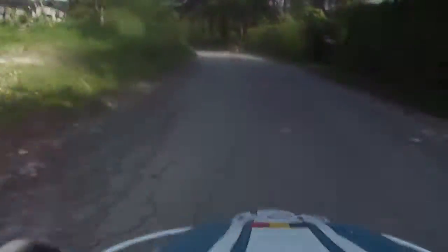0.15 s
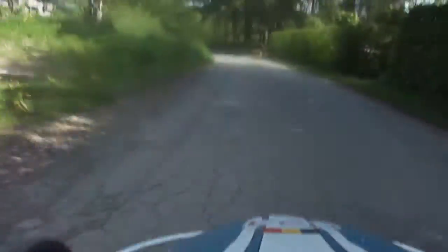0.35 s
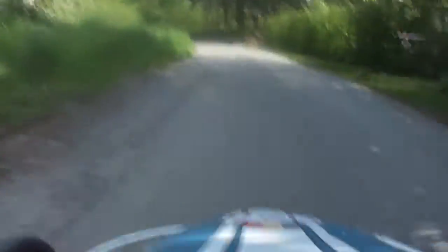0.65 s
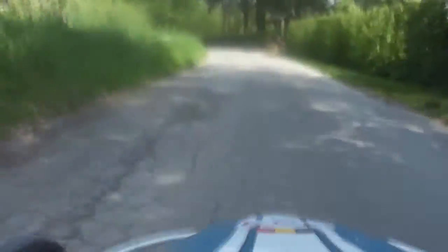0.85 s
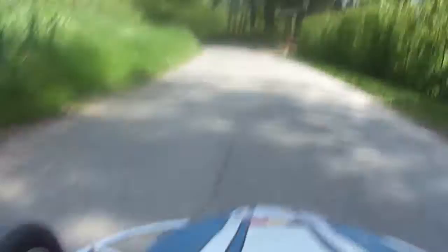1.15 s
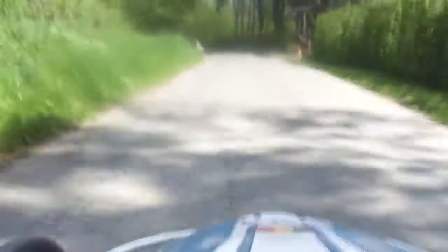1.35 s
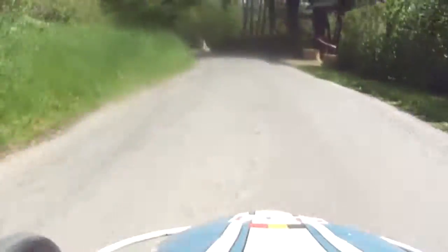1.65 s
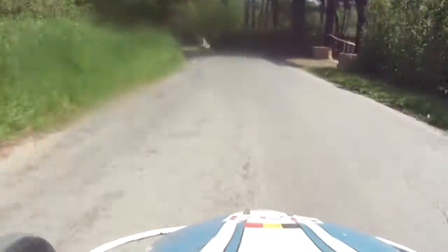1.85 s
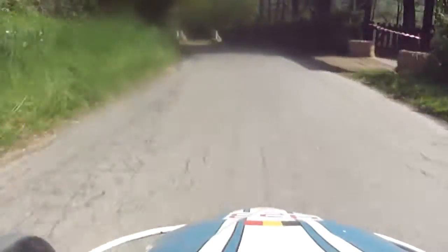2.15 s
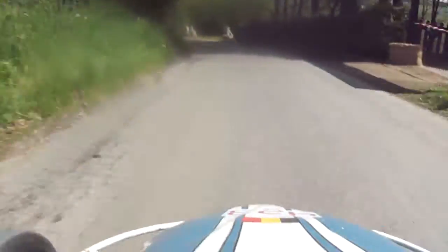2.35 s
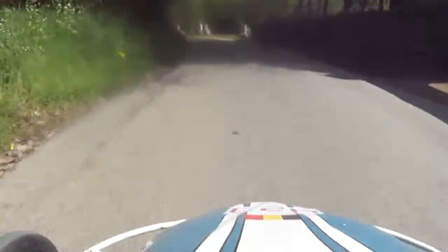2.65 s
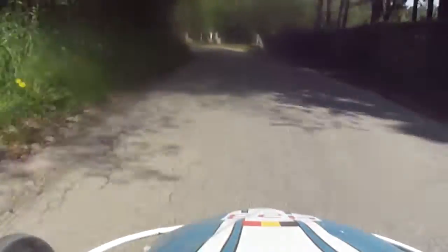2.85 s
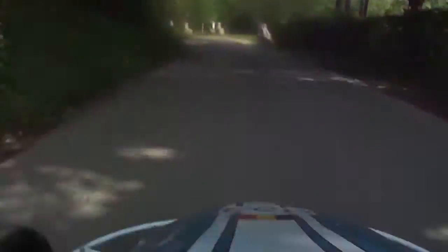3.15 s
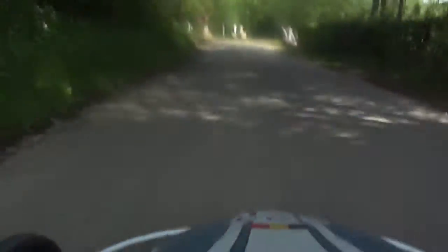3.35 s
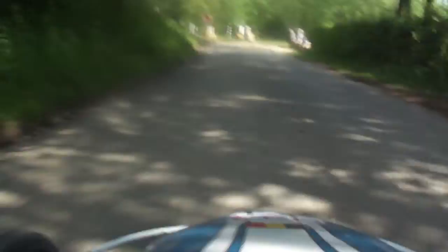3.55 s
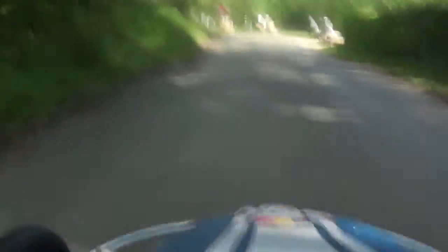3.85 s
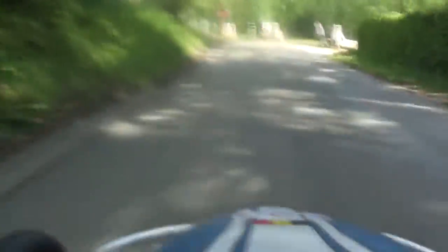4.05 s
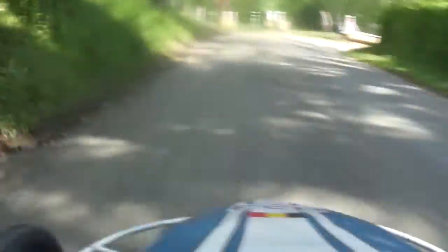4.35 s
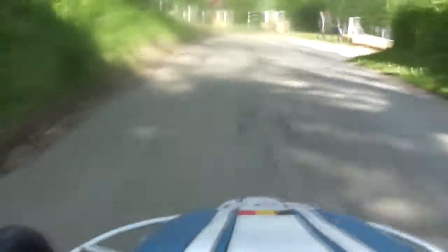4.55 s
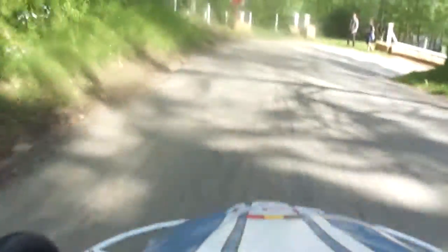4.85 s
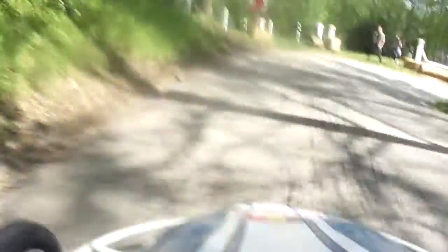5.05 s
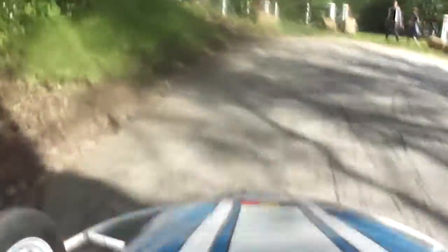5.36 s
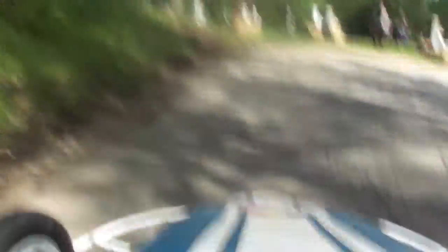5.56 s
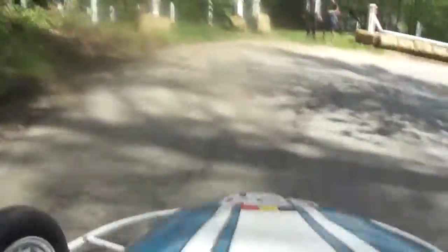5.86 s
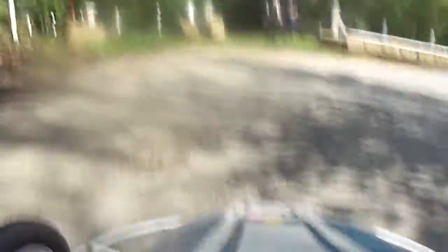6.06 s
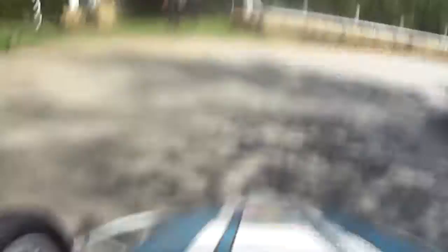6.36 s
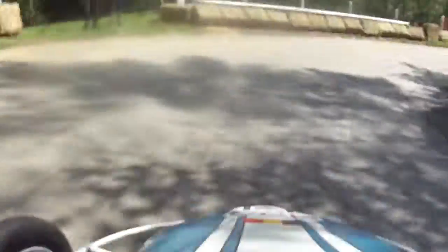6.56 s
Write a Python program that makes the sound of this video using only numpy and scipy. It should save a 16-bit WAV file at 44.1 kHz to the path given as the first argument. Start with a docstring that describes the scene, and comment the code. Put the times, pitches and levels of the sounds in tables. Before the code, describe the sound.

Fast cart rolling downhill: roaring wind buffets and gritty tyre hiss, then slowing, dry tyre judder, a sharp wheel knock and busy clattering.

```python
"""Unpowered cart on a rough bend

Eddies beat on a microphone at the nose of a fast cart and ease as it slows for a bend: noise pulses,
with single pressure swings for buffets and dull shell knocks. Tyre hiss and chassis rumble are shaped
noise; jolts swell them and the wind. Fittings rattle (noise bursts into damped modes), grit ticks. Before
and in the bend the brake rubs and a tyre judders (noise in slips); a wheel strikes one hard edge."""
import sys
import numpy as np
from scipy import signal
from scipy.fft import rfft, irfft, next_fast_len
from scipy.io import wavfile
from scipy.ndimage import uniform_filter1d

SR = 44100
rng = np.random.default_rng(int(sys.argv[2]) if len(sys.argv) > 2 else 0)


def wav_out(sig):
    """Save sig, one row per channel (or a flat mono array), as 16-bit PCM at SR to the path in sys.argv[1]."""
    wavfile.write(sys.argv[1], SR, np.round(np.clip(np.atleast_2d(sig).T, -1, 1) * 32767).astype(np.int16))


N = 295029
TIME = np.arange(N) / SR


def undb(db):
    """Decibels to gain."""
    return 10 ** (np.asarray(db) / 20)


def curves(table):
    """Columns of a table after the first, interpolated to one value per sample."""
    s, *columns = np.transpose(table)
    return [np.interp(TIME, s, c) for c in columns]


def unit(x, lo_hz, hi_hz):
    """Scale a sound so that the given band has rms 1."""
    sos = signal.butter(4, [lo_hz, hi_hz], "band", fs=SR, output="sos")
    return x / np.std(signal.sosfilt(sos, x))


def colour(x, points, size=4096):
    """Causal filter through (f/Hz, level/dB) points, built from the cepstrum of the log gain."""
    hz, db = np.transpose(points)
    bins_hz = np.maximum(np.arange(size // 2 + 1) * SR / size, 1)
    gain = undb(np.interp(np.log(bins_hz), np.log(hz), db))
    cepstrum = irfft(np.log(gain))
    # fold to minimum phase
    cepstrum[1:size // 2] *= 2
    cepstrum[size // 2 + 1:] = 0
    impulse_response = irfft(np.exp(rfft(cepstrum)))
    return signal.fftconvolve(x, impulse_response)[:N]


def around(x, hz):
    """Keep a broad band about the given frequency."""
    return signal.sosfilt(signal.butter(1, [hz / 2, hz * 2], "band", fs=SR, output="sos"), x)


def octaves(x, count=10):
    """Overlapping octave bands (centre Hz, sound) that add up to the sound again."""
    size = next_fast_len(N)
    centres_hz = SR / 2 ** np.arange(count, 0, -1)
    spectrum = rfft(x, size)
    bins_hz = np.maximum(np.arange(size // 2 + 1) * SR / size, 1)
    for hz, share in zip(centres_hz, np.eye(count)):
        weight = np.interp(np.log(bins_hz), np.log(centres_hz), share)
        yield hz, irfft(spectrum * weight, size)[:N]


def walk(rate):
    """A quick random flicker with spread 1, about `rate` turns a second and no slow drift."""
    y = np.interp(TIME * rate, np.arange(N), rng.standard_normal(N))
    y = y - uniform_filter1d(y, size=SR // 16)
    return y / y.std()


def impacts(rate, spread_db):
    """Randomly timed impulses of uneven size and sign, rms 1."""
    hits = rng.random(N) < rate / SR
    size_db = spread_db * np.clip(rng.standard_normal(N), -2, 2)
    x = hits * undb(size_db) * rng.choice([-1, 1], N)
    return x / x.std()


def grains(rate, spread_db, decay_s):
    """Randomly timed little bursts of noise, rms 1."""
    decay = np.exp(-TIME[:SR // 8] / decay_s)
    envelope = signal.fftconvolve(np.abs(impacts(rate, spread_db)), decay)[:N]
    x = envelope * rng.standard_normal(N)
    return x / x.std()


def gate(start, length, attack, release):
    """An envelope that rises to 1, holds and dies away (release is a time constant)."""
    rise = np.clip((TIME - start) / attack, 0, 1)
    return rise * np.exp(-np.maximum(TIME - start - length, 0) / release)


PATCH_S, PATCH_ENTRY_S = 5.53, 0.072  # start of the rough patch, time to run onto it


def on_patch(lane, patch):
    """A quantity that changes from its value on the lane to that on the rough patch."""
    return lane + (patch - lane) * np.clip((TIME - PATCH_S) / PATCH_ENTRY_S, 0, 1)


# jolts over uneven asphalt: t/s, length/s, swell/dB, extra small eddies/dB
JOLT_EVENTS = [(0.042, .028, 3, -3), (0.19, 0.15, 0.9, 0.5), (0.352, 0.024, 2, 2), (0.426, .024, 1.5, -3),
               (.545, 0.024, -2, 1.5), (0.69, 0.073, 2, -1.5), (0.776, 0.028, -0.5, 1),
               (0.888, 0.061, 2, -2), (1.381, .022, 2.5, -4), (1.432, 0.03, 2, 0),
               (1.938, 0.057, 2.5, -4.5), (2.215, 0.021, 0.5, -3), (2.32, 0.035, 1.5, 1.5),
               (2.404, 0.11, 1.9, 1), (2.68, 0.024, 1.5, -2.5), (2.83, 0.033, 3, -7),
               (2.926, 0.028, 2.5, -1.5), (3.015, 0.026, 1.5, 0), (3.098, 0.1, 1, 2),
               (3.255, 0.041, 1, 0.5), (3.417, .07, 1.5, -1), (3.87, 0.093, 0, 1.5),
               (3.994, 0.033, -0.5, -4), (4.63, 0.086, 2.5, 1), (4.793, 0.03, 3, -3), (4.927, 0.16, 4, 0.5),
               (5.113, 0.047, 4.5, 0), (5.2, 0.073, 5, 0), (5.314, 0.042, 5.5, -7), (5.605, 0.03, 3.5, -2),
               (5.636, 0.052, 1.2, -5), (5.747, 0.095, 5, 6.5), (5.884, 0.083, 3.5, 6.5),
               (6.01, 0.025, 6.5, -18), (6.055, 0.079, 4, 5.5), (6.175, 0.073, 2.5, -1),
               (6.313, 0.088, 3, 4.5), (6.445, .02, 3.5, 2), (6.478, .04, 4.3, 0), (6.555, 0.17, 3, -12)]
# brief dips in the level of wind and tyre noise, partly random unevenness:
# t/s, depth/dB, half-width (to 1/e)/s
LEVEL_DIPS = [(.12, 1, .023), (.16, 2.8, .023), (.345, 3, .02), (.41, 2, 0.018), (.46, 6, 0.0062),
              (.51, 4.5, 0.021), (.61, 3, 0.033), (.85, 1, .022), (1.216, 2.5, .02), (1.414, 3.5, .01),
              (2.009, 4, .01), (2.18, 2, 0.023), (2.77, 3, 0.041), (2.885, 4, 0.014), (3.075, 3.5, 0.017),
              (3.231, 2.5, .012), (3.374, 2, 0.01), (3.733, 1, 0.01), (3.958, 1, 0.0076), (4.09, 3, .015),
              (4.557, 2, .018), (4.62, 1.5, .012), (4.875, 4.5, .023), (5.29, 2.5, .023),
              (5.722, 4.5, 0.016), (5.974, 1, .012), (6.27, 4, 0.017), (6.645, 2, .012)]
JOLT_ATTACK_S, JOLT_RELEASE_S = 0.011, 0.009
SWAY_DB, SWAY_PER_S = -0.4, 42


def jolts():
    """Swell and extra small eddies from the jolts, in dB, over a random sway and brief level dips."""
    swell_db, stir_db = SWAY_DB * walk(rate=SWAY_PER_S), 0
    for s, length_s, db, small_db in JOLT_EVENTS:
        shape = gate(s, length_s, JOLT_ATTACK_S, JOLT_RELEASE_S)
        swell_db = swell_db + db * shape
        stir_db = stir_db + small_db * shape
    dip_db = sum(db * np.exp(-((TIME - s) / width_s) ** 2) for s, db, width_s in LEVEL_DIPS)
    return swell_db - dip_db, stir_db


# scale of the quick flutter: t/s, depth/dB
FLUTTER_DEPTH = [(0, 1.7), (.9, 1.9), (1.6, 1.2), (2.4, 1.8), (2.9, 2.4), (4.4, 2.3), (5.3, 0.5),
                 (5.8, 1.9)]
FLUTTER_SAG_PER_DB = 0.2  # drops out more deeply than it peaks


def gust_flutter():
    """Quick gusts, in dB, at two random rates."""
    depth_db, = curves(FLUTTER_DEPTH)
    flutter = depth_db * (0.51 * walk(rate=75) + 0.55 * walk(rate=190))
    return flutter - FLUTTER_SAG_PER_DB * (flutter ** 2 - flutter.var())


# wheels on the asphalt down to the bend: t/s, hiss level/dB, rumble level/dB
ROLL_LEVELS = [(0, -46.5, -55), (.8, -47.5, -59), (1.6, -41.5, -59), (2.5, -42.5, -59), (3.1, -45.5, -53.5),
               (3.7, -53.5, -59), (4.1, -56, -52), (4.75, -55.5, -58), (5.1, -60, -51.5), (5.27, -70, -58),
               (5.55, -60, -47)]
# chassis rumble spectrum: f/Hz, density/dB
RUMBLE_SPECTRUM = [(15, -34), (30, -25), (55, -5.5), (90, -1.5), (150, 3.5), (260, 6.5), (600, -34),
                   (2000, -68)]
PATCH_RUMBLE_DB = -47
JOLT_RUMBLE = 0.66  # dB per dB of swell


def chassis(swell_db):
    """The road's unevenness shakes the chassis: low noise that swells with the jolts."""
    _, shake_db = curves(ROLL_LEVELS)
    rumble_db = on_patch(shake_db, PATCH_RUMBLE_DB) + JOLT_RUMBLE * swell_db
    return unit(colour(rng.standard_normal(N), RUMBLE_SPECTRUM), 30, 130) * undb(rumble_db)


# tyre hiss spectrum: f/Hz, density/dB
TYRE_SPECTRUM = [(200, -50), (1200, 3.5), (2900, 8), (3800, 2.5), (5600, -3.5), (7000, -8.5), (9000, -14),
                 (11000, -20)]
PATCH_HISS_DB = -52
BEARING_HISS_DB = -62.5  # steady through every dip


def tyres(flutter, swell_db):
    """Tyres hiss and crunch over the grit (noise and grains) above an even hiss of the wheel bearings."""
    roll_db, _ = curves(ROLL_LEVELS)
    hiss_db = on_patch(roll_db, PATCH_HISS_DB) + swell_db
    contact = rng.standard_normal(N) + grains(rate=500, spread_db=4.5, decay_s=0.00045)
    hiss = unit(colour(contact, TYRE_SPECTRUM), 4500, 10500)
    bearing_hiss = unit(colour(rng.standard_normal(N), TYRE_SPECTRUM), 4500, 10500)
    grain_db = 0.9 * flutter + 0.96 * walk(rate=55)  # coarse and smooth spots under the tyres
    return hiss * undb(hiss_db + grain_db) + bearing_hiss * undb(BEARING_HISS_DB)


# light rubs, probably the brake: t/s, length/s, level at onset/dB
BRAKE_RUBS = [(4.275, 0.27, -46), (4.583, 0.072, -48), (4.816, 0.082, -46.5), (4.969, 0.063, -43.5),
              (5.34, 0.2, -57)]
# thin scrape and its metallic resonances: f/Hz, density/dB
BRAKE_SPECTRUM = [(800, -3), (2000, -5), (2900, -2), (3800, -3), (4450, 2), (5000, -3), (5650, 4.5),
                  (6300, -5), (6850, -3), (7550, -11), (8150, -6), (9000, -11), (11000, -13)]
RUB_ATTACK_S, RUB_RELEASE_S, RUB_FADE_DB_PER_S = 0.014, 0.017, 13


def brake():
    """A light, gritty rub that catches and lets go dozens of times a second, faintly metallic."""
    pressure = 0
    for s, length_s, db in BRAKE_RUBS:
        fade_db = RUB_FADE_DB_PER_S * np.maximum(TIME - s, 0)
        pressure = pressure + gate(s, length_s, RUB_ATTACK_S, RUB_RELEASE_S) * undb(db - fade_db)
    catch_hz = 62 * undb(1.9 * walk(rate=50))
    phase = np.cumsum(catch_hz) / SR % 1
    slips = rng.standard_normal(N) * (np.exp(-phase / .2) + undb(2))
    return unit(colour(slips, BRAKE_SPECTRUM), 2000, 11000) * pressure


# slip rate: t/s, f/Hz
SLIP_RATE = [(5.42, 58.8), (5.5, 81)]
# slip spectrum: f/Hz, density/dB
JUDDER_SPECTRUM = [(500, 1), (1600, 4), (2100, -1), (2650, 5), (3400, -7), (4500, -7), (7000, -17),
                   (11000, -23)]
JUDDER_S, JUDDER_LENGTH_S, SLIP_DECAY_S = 5.279, 0.285, 0.0032
JUDDER_START_DB, JUDDER_GAIN_DB_PER_S = -32.5, 25


def judder():
    """A tyre grips and slips sideways in dry ticks that quicken and grow as the cart turns in."""
    rate_hz, = curves(SLIP_RATE)
    phase = np.cumsum(rate_hz * (TIME > JUDDER_S)) / SR % 1
    age_s = phase / rate_hz
    slips = rng.standard_normal(N) * np.exp(-age_s / SLIP_DECAY_S) * undb(1.5 * walk(rate=56))
    load_db = JUDDER_START_DB + JUDDER_GAIN_DB_PER_S * np.clip(TIME - JUDDER_S, 0, JUDDER_LENGTH_S)
    envelope = gate(JUDDER_S, JUDDER_LENGTH_S, RUB_ATTACK_S, RUB_RELEASE_S) * undb(load_db)
    return colour(slips, JUDDER_SPECTRUM) * envelope


# shell thumps: t/s, level before band filter/dB, f/Hz, decay/s
SHELL_THUMPS = [(5.7442, -3.5, 745, 0.00092), (5.7475, -1.5, 380, 0.0014)]
# snap spectrum: f/Hz, density/dB
SNAP_SPECTRUM = [(100, -20), (500, 4), (2400, 14), (3800, 0), (6000, 0), (10500, -4)]
EDGE_S, SNAP_GAIN_DB, SNAP_S = 5.7439, -21.5, 0.0032


def edge_hit():
    """A wheel meets a hard edge: a bright noise snap; the shell thumps, then lower as it drops."""
    burst = rng.standard_normal(N) * gate(EDGE_S, SNAP_S, attack=.0006, release=.0009)
    out = undb(SNAP_GAIN_DB) * colour(burst, SNAP_SPECTRUM)
    for s, db, hz, decay_s in SHELL_THUMPS:
        age_s = np.maximum(TIME - s, 0)
        thump = np.sin(2 * np.pi * hz * age_s) * np.exp(-age_s / decay_s)
        out = out + undb(db) * around(thump, hz)
    return out


# grit tick spectrum: f/Hz, density/dB
GRIT_SPECTRUM = [(1000, 3), (2500, 1), (4500, -10.5), (9000, -9.5)]
GRIT_PER_S, GRIT_FROM_S = 120, 4.55
GRIT_GAIN_DB, PATCH_GRIT_GAIN_DB = -58.5, -47.5


def grit_ticks(swell_db):
    """Loose grit ticks against wheels and frame in little noise bursts, most on the patch."""
    grit = colour(grains(GRIT_PER_S, spread_db=-0.5, decay_s=.0022), GRIT_SPECTRUM)
    level_db = on_patch(GRIT_GAIN_DB, PATCH_GRIT_GAIN_DB) + swell_db
    return grit * undb(level_db) * (TIME > GRIT_FROM_S)


# fittings knocked by bumps: t/s, level before treble tilt and frame/dB, chatter decay/s, treble/dB
KNOCKS = [(1.941, -28, .004, 0), (1.983, -23, .004, -3), (2.432, -26, .004, -2), (2.4595, -24, .003, -3),
          (3.64, -38, .004, -4), (3.705, -24, .012, -10), (3.939, -32, .004, -4), (4.004, -22.5, .004, -9),
          (4.032, -31, .004, -4), (4.055, -27, .004, -7), (4.073, -25.5, .004, -9), (4.4872, -34, 0.022, 5),
          (4.635, -29, 0.018, -2), (4.661, -32, .008, -6), (4.833, -33, .01, -3), (4.838, -25.5, 0.008, -2),
          (4.9187, -34, .005, -3), (4.931, -29, .005, -3), (5.008, -35, .012, 2), (5.0305, -29, .006, 0),
          (5.1025, -40, .003, -9), (5.1657, -39, 0.02, 1), (5.3635, -35, .004, -3),
          (5.5104, -24.5, 0.0073, -8), (5.6408, -23.5, 0.0045, -2), (5.648, -26, .005, 0),
          (5.663, -28, .004, -3), (5.752, -27, 0.0097, 0), (5.7585, -27, .004, 1), (5.8235, -28, .005, -7),
          (5.9885, -27.5, 0.011, 0), (6.0808, -26, .008, -5), (6.11, -27, .005, -3), (6.195, -29, .004, -8),
          (6.247, -28, .004, -6), (6.276, -23, .005, -8), (6.3047, -28, .018, 1), (6.3115, -31, .006, 1),
          (6.412, -25, .005, -4), (6.452, -34, .004, -2), (6.483, -33, .012, 3), (6.5625, -33, .004, -2),
          (6.5955, -30, .004, 0), (6.6555, -36, .008, 4), (6.679, -32, .004, 1)]


def knocks():
    """Each bump throws a loose fitting against the frame: a noise burst with a chattering tail."""
    t = TIME[:SR // 8]
    contact = np.zeros(N + len(t))
    for s, db, decay_s, treble_db in KNOCKS:
        envelope = np.exp(-(t / 0.004) ** 2) + undb(2.5) * np.exp(-t / decay_s)
        chatter = rng.standard_normal(len(t)) * envelope
        chatter = chatter / np.abs(chatter).max()
        chatter = colour(chatter, [(3000, 0), (9000, treble_db)], size=256)[:len(t)]
        start = int(s * SR)
        contact[start:start + len(t)] += undb(db) * chatter
    return contact[:N]


# modes of the fittings: f/Hz, level/dB, t60/s
FITTING_MODES = [(2330, 0, .02), (2970, 5, 0.021), (3970, 9, .02), (4800, 3, .02), (5530, 1, .02),
                 (5750, 10, .02), (7150, -1, .02), (8800, -10, .02), (10100, -10, .02)]
# clack of a fitting against the frame: f/Hz, density/dB
CLACK_SPECTRUM = [(200, -2), (1200, 7), (3000, 10.5), (6000, 0.5), (11000, -8)]
RING_SCATTER_DB = 3.5  # each blow lands elsewhere and favours other modes


def rattles(swell_db):
    """Knocks and grit clack on the frame and drive damped sine modes that barely ring."""
    t = TIME[:SR // 8]
    contact = knocks() + grit_ticks(swell_db)
    rings = []
    for hz, db, t60_s in FITTING_MODES:
        decay = np.exp(-np.log(1000) * t / t60_s)
        rings.append(undb(db) * decay * np.sin(2 * np.pi * hz * t))
    body = 0
    for ring in rings:
        drive = contact * undb(RING_SCATTER_DB * walk(rate=36))
        body = body + signal.fftconvolve(drive, ring)[:N]
    body = body / np.linalg.norm(sum(rings))
    return undb(3.5) * colour(contact, CLACK_SPECTRUM) + undb(-16) * body


# airflow down to the bend: t/s, strength/dB, share of small fast eddies/dB, of large slow ones/dB
AIRFLOW = [(0, -21, 1.5, -3), (.4, -19, 2, -4), (.85, -19, 4, -7), (1.25, -20, 2.5, 0.5),
           (1.45, -18, 3, -1), (2.45, -19, 1.2, 0.5), (2.75, -19, -2, 2), (3.25, -19.5, 0, -1.5),
           (3.8, -19.5, -1, -9), (4.1, -19.5, -4, -1), (4.42, -19.5, -6.5, -1), (4.55, -23.5, -11, -1),
           (4.88, -30, -8, 6), (5.2, -30.5, -25, 2), (5.3, -36, -26, 3), (5.45, -35.5, -19, 5)]
# wind pressure on the microphone: f/Hz, density/dB
WIND_SPECTRUM = [(20, -56), (45, -47), (80, -21.5), (150, -10.5), (250, -4), (420, 0), (650, 0.5),
                 (1250, -0.5), (1900, -5.5), (2700, -13.5), (4000, -27.5), (6000, -37.5), (11000, -61)]
PATCH_AIR_DB, PATCH_SMALL_DB, PATCH_LARGE_DB = -27, -9, 10
PATCH_GAIN_DB_PER_S = 4  # airflow picks up through the bend; large eddies stay level
JOLT_LARGE = 0.68  # dB by which large eddies lag per dB of swell


def wind(flutter, swell_db, stir_db):
    """Eddies strike the microphone as short pressure pulses; in a gust the small ones grow most."""
    air_db, lane_small_db, lane_large_db = curves(AIRFLOW)
    gain_db = PATCH_GAIN_DB_PER_S * (TIME - PATCH_S)
    strength_db = on_patch(air_db, PATCH_AIR_DB + gain_db) + swell_db
    small_db = on_patch(lane_small_db, PATCH_SMALL_DB) + stir_db
    large_db = on_patch(lane_large_db, PATCH_LARGE_DB - gain_db) - JOLT_LARGE * swell_db
    eddies = impacts(rate=2200, spread_db=3) + undb(-2.5) * rng.standard_normal(N)
    pressure = unit(colour(eddies, WIND_SPECTRUM), 400, 2000)
    out = 0
    for hz, band in octaves(pressure):
        small = np.interp(np.log(hz), np.log([1050, 2700]), [0, 1])
        large = np.interp(np.log(hz), np.log([250, 750]), [1, 0])
        own_db = (0.85 + 0.28 * small) * walk(rate=60)  # each eddy size also flickers alone
        gust_db = flutter * (0.57 + 0.48 * small) + own_db
        out = out + band * undb(small * small_db + large * large_db + gust_db)
    return out * undb(strength_db)


# hard buffets of air and, on the rough patch, dull knocks of the chassis shell:
# t/s, level before trims and filters/dB, swing f/Hz, wake decay/s
BUFFETS_AND_SHELL_KNOCKS = [(0.009, -6, 700, .008), (.066, -7.5, 600, .006), (.083, -12, 650, .002),
                            (0.437, -9, 700, .005), (0.553, -6, 750, 0.012), (.62, -7, 700, 0.0018),
                            (.755, -6, 750, .003), (.997, -8, 700, .002), (2.94, -9, 650, .007),
                            (3.6205, -9, 700, .002), (3.874, -10, 805, 0.0047), (3.909, -5, 905, 0.0037),
                            (4.003, -0.5, 704, 0.0087), (4.053, -1, 700, .003), (4.2216, -7, 850, .0015),
                            (4.451, -8, 700, .004), (4.597, -11, 700, 0.006), (4.832, -9.5, 900, 0.0055),
                            (4.928, -12, 447, 0.0043), (4.9533, -11, 570, 0.0032),
                            (4.985, -11, 650, 0.0033), (5.117, -5, 543, 0.0018), (5.3335, -20, 600, 0.0072),
                            (5.566, -15.5, 600, .008), (5.5925, -12, 650, .008), (5.6127, -12, 600, .003),
                            (5.6215, -4, 700, 0.0044), (5.661, -5, 450, 0.0035), (5.7737, -12, 1000, .003),
                            (5.793, -6, 500, .002), (5.7995, -5, 850, .003), (5.8235, -14, 900, .002),
                            (5.8566, 1, 900, 0.0007), (5.9484, -5, 700, .006), (5.986, -9, 650, .002),
                            (6.023, -6, 550, 0.0046), (6.08, -6, 1010, 0.0043), (6.107, -3, 447, .005),
                            (6.154, -8, 700, .002), (6.189, -7, 900, 0.0056), (6.195, -7, 650, 0.0022),
                            (6.215, -7, 800, .003), (6.3123, -5, 600, 0.0045), (6.4624, -2, 650, .004),
                            (6.4805, -6, 1000, 0.012), (6.488, -4, 800, 0.0037), (6.511, -4.5, 600, .005),
                            (6.517, -1, 700, .002), (6.535, -4, 500, 0.007), (6.562, -9, 700, 0.0036),
                            (6.5775, -4, 650, 0.0044), (6.618, -4, 550, .002), (6.625, -3, 506, 0.0022),
                            (6.68, -1.5, 590, 0.0023)]


def buffets_and_shell_knocks():
    """A buffet of air or, on the rough patch, a shell knock: one steep swing, a short noise wake."""
    t = TIME[:SR // 20]
    swings, wakes = np.zeros((2, N + len(t)))
    for s, db, hz, wake_s in BUFFETS_AND_SHELL_KNOCKS:
        start = int(s * SR)
        phase = 2 * np.pi * hz * (t - .0012)
        swing = phase * np.exp((1 - phase ** 2) / 2)
        wake = np.exp(-t / wake_s) * rng.standard_normal(len(t))
        swings[start:start + len(t)] += undb(db - 3.5) * around(swing, hz)
        wakes[start:start + len(t)] += undb(db + 1.8) * around(wake, hz)
    return swings[:N] + colour(wakes, WIND_SPECTRUM)


def scene():
    """Jolts and gusts make wind and tyre noise swell and flutter together."""
    flutter = gust_flutter()
    swell_db, stir_db = jolts()
    rolling = chassis(swell_db) + tyres(flutter, swell_db)
    contacts = brake() + judder() + edge_hit() + rattles(swell_db)
    foreground = wind(flutter, swell_db, stir_db) + buffets_and_shell_knocks()
    return (rolling + contacts + foreground)[None]


def record(dry):
    """Soft saturation rounds the highest peaks; a steep low-pass cuts the top."""
    ceiling = undb(-4)
    rounded = ceiling * np.tanh(dry / ceiling)
    low_pass = signal.ellip(12, .2, 80, 10950, fs=SR, output="sos")  # ripple dB, stop dB, edge Hz
    return signal.sosfilt(low_pass, rounded)


dry = scene()
out = record(dry)
wav_out(out)
```